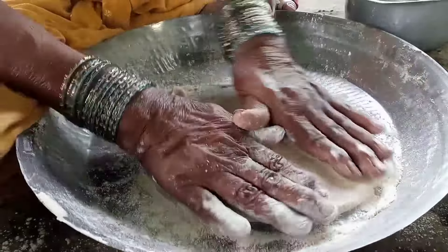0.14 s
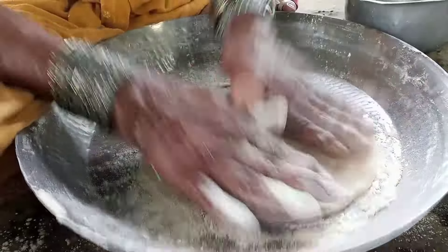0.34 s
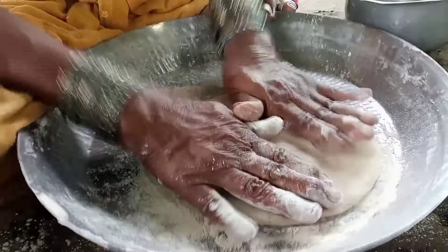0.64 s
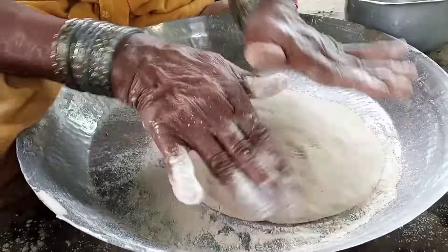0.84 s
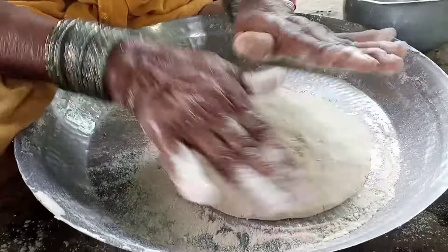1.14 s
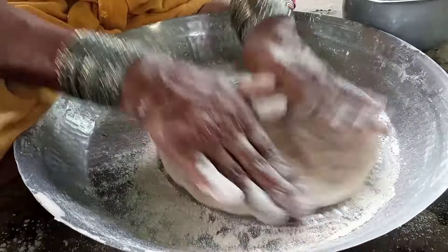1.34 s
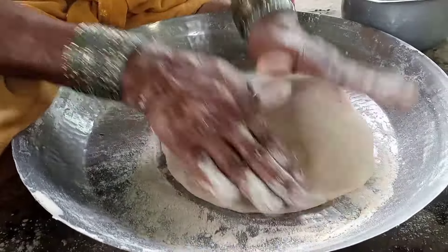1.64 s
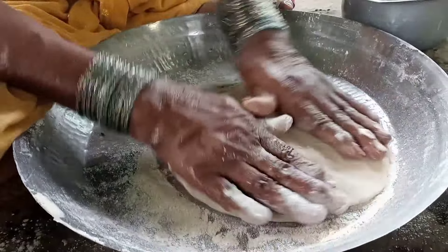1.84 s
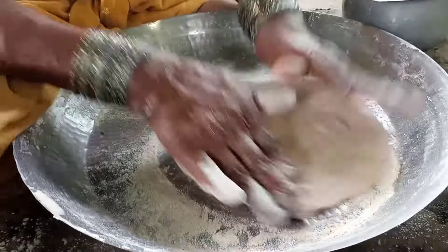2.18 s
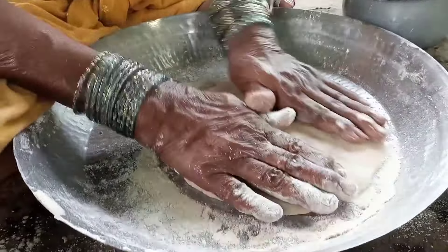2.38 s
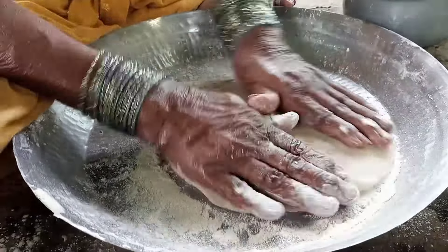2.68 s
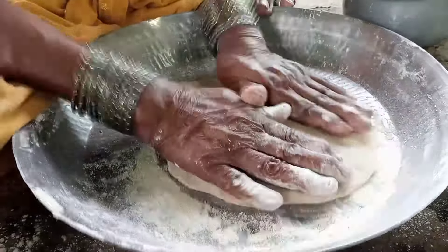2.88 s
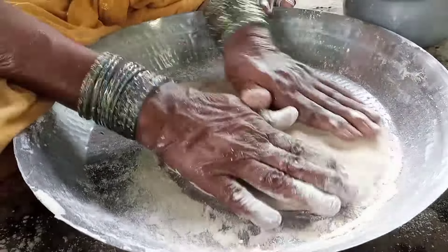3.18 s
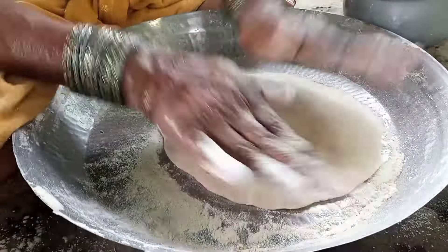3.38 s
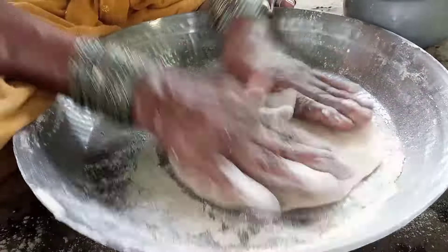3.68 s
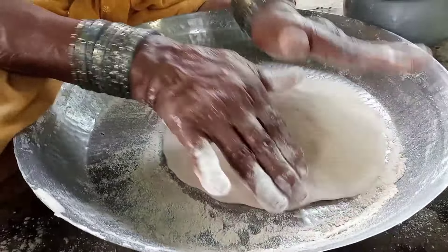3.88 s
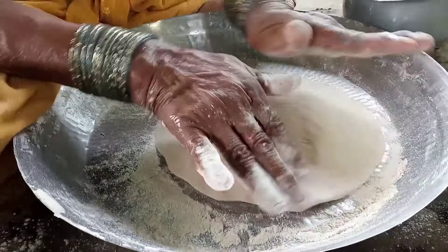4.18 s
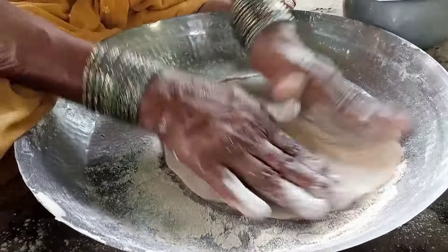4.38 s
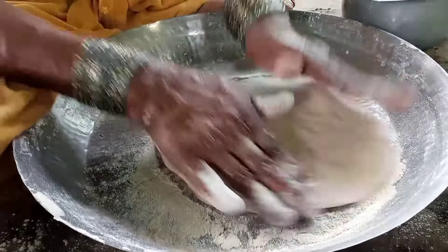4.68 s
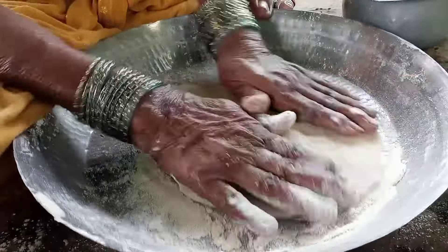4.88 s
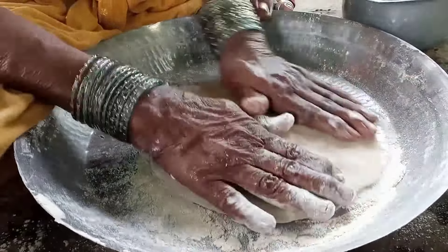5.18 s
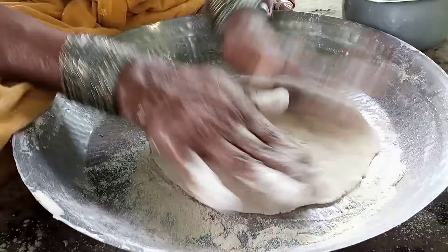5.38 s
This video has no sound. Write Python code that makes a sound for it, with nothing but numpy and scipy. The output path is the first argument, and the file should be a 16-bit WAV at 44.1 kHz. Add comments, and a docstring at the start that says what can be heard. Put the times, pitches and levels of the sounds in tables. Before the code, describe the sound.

Brisk rhythmic dough slaps, about three and a half a second, thud in a pan while stacked bangles clink brightly and faint birds chirp.

```python
"""Patting dough in a floury pan

Two hands pat a disc of dough flat in a metal pan, close to a phone in a small kitchen. Each pat is two quick
contacts, fingers then palm: noise bursts smack, a sagging sine thuds and damped modes ring the pan.
Flurries of glass contacts excite the modes of stacked bangles; grainy noise gives rustling flour and scuffs.
Swept sines whistle like small birds over a faint hum and ambience; a limiter ducks the peaks."""
import sys
import numpy as np
from scipy import signal
from scipy.fft import rfft, irfft, next_fast_len
from scipy.io import wavfile
from scipy.ndimage import uniform_filter1d, minimum_filter1d, map_coordinates

SR = 44100
rng = np.random.default_rng(int(sys.argv[2]) if len(sys.argv) > 2 else 0)


def bounce(signal):
    """Save signal as a 16-bit WAV file at the path given by the first command-line argument."""
    frames = np.transpose(np.atleast_2d(signal))
    limited = np.clip(frames, -1, 1)
    pcm = np.round(limited * 32767).astype(np.int16)
    wavfile.write(sys.argv[1], SR, pcm)


N = 243873

# All level_db columns are relative: each source applies its own gain to them.


def amp(db):
    """Decibel law: the amplitude ratio of a level."""
    return 10 ** (np.asarray(db) / 20)


def unit(x):
    """Normalisation to an rms of 1."""
    return x / np.sqrt(np.mean(x ** 2) + 1e-20)


def along(points, hz):
    """Linear interpolation of (frequency_hz, value) points on a log-frequency axis."""
    f, v = np.transpose(points)
    return np.interp(np.log(hz + 1), np.log(f + 1), v)


def add(track, s, sound):
    """Superposition: mix a sound into the track at time s."""
    start = max(0, round(s * SR))
    part = sound[:max(0, N - start)]
    track[start:start + len(part)] += part


def filtered(x, response):
    """Linear filtering: multiply the spectrum by a response of frequency."""
    m = next_fast_len(N + SR // 2)
    spectrum = rfft(x, m) * response(np.fft.rfftfreq(m, 1 / SR))
    return irfft(spectrum, m)[:N]


def coloured(x, spectrum, size=4096):
    """Minimum-phase filtering: a causal impulse response of energy 1 with this spectral shape."""
    cepstrum = irfft(np.log(amp(along(spectrum, np.fft.rfftfreq(size, 1 / SR)))))
    # folding the cepstrum onto positive times makes the filter causal
    cepstrum[1:size // 2] *= 2
    cepstrum[size // 2 + 1:] = 0
    impulse = irfft(np.exp(rfft(cepstrum)))
    return signal.fftconvolve(x, impulse / np.linalg.norm(impulse))[:N]


def grains(spread_db, size=N):
    """Granular friction: noise of rms 1 made of tiny contacts of unequal strength."""
    strengths = amp(spread_db * rng.standard_normal(size // 16 + 1))
    return unit(rng.standard_normal(size) * np.repeat(strengths, 16)[:size])


def wobble(rate, size):
    """Random modulation: a smooth curve through random knots, rate of them a second."""
    knots = rng.standard_normal(int(size * rate / SR) + 4)
    return map_coordinates(knots, [np.arange(size) * rate / SR])


def fade(t, attack, t60):
    """Damped envelope: a quick rise and an exponential decay."""
    return (1 - np.exp(-t / attack)) * amp(-60 * t / t60)


# Reverberation of the room: frequency_hz, t60_s
KITCHEN_DECAY = [(80, 0.48), (400, 0.2), (2000, 0.43), (7000, 0.073), (15000, 0.13)]


def kitchen(x, count=20):
    """Diffuse reverberation: decaying noise tails, a new one per section because the moving hands alter it."""
    wet = np.zeros(N)
    for part in np.array_split(np.arange(N), count):
        hz, t, z = signal.stft(rng.standard_normal(SR // 2), SR, nperseg=256)
        decay = amp(-60 * t / along(KITCHEN_DECAY, hz)[:, None])
        tail = signal.istft(z * decay, SR, nperseg=256)[1]
        echo = signal.fftconvolve(x[part], tail / np.linalg.norm(tail))
        add(wet, part[0] / SR + .006, echo)
    return wet


# Spectral shape of the quiet house: frequency_hz, level_db
AMBIENCE_SPECTRUM = [(18, -40), (30, -20), (215, 0.5), (374, -13), (449, 5), (666, -11), (913, 1),
                     (1430, -21), (2540, -14), (6380, -16.5), (7270, -29), (8300, -57), (13000, -71),
                     (14800, -38), (16000, -12)]


def ambience():
    """Stationary background noise: white noise shaped by a fixed spectrum."""
    return amp(-36) * coloured(rng.standard_normal(N), AMBIENCE_SPECTRUM)


def hum(hz=445, width_hz=22):
    """Narrow-band noise: a resonant response makes a faint, steady hum in the room."""
    band = filtered(rng.standard_normal(N), lambda f: 1 / (1 + ((f - hz) / width_hz) ** 2))
    return amp(-43.5) * unit(band)


# After each pat the dough slides round on the flour
SLIDE_DELAY_S, SLIDE_RISE_S, SLIDE_HOLD_S, SLIDE_FALL_S = 0.042, 0.019, 0.075, 0.21
REST_DB = -40  # the resting hand still rubs a little
PAT_PERIOD_S = .28
# How hard the dough rubs as it slides: time_s, level_db
SLIDE_LEVEL = [(0, -34), (.5, -37.5), (1.5, -38), (2.6, -36.5), (3.05, -36.5), (4.1, -33.5), (4.7, -37),
               (5.1, -32), (5.5, -36)]


def sliding():
    """Sliding friction: rubbing follows every pat, and one slide is already under way at the start."""
    t = np.arange(N) / SR
    starts = [PATS[0][0] - PAT_PERIOD_S] + [s for s, *_ in PATS]
    corners = np.cumsum([SLIDE_DELAY_S, SLIDE_RISE_S, SLIDE_HOLD_S, SLIDE_FALL_S])
    speed = sum(np.interp(t - s, corners, [0, 1, 1, 0]) for s in starts)
    slide_gain = amp(np.interp(t, *np.transpose(SLIDE_LEVEL)))
    return np.hypot(amp(REST_DB), speed * slide_gain)


# Spectral shape of the rustle: frequency_hz, level_db
FLOUR_SPECTRUM = [(150, -17), (450, 3.5), (700, 1.5), (1050, -0.5), (1600, -6.5), (2400, 3.5), (3400, 5),
                  (5000, 2), (6800, -1.5), (8300, -17), (15000, -51)]


def flour(unevenness_db=1.4):
    """Granular friction: fine grains rub unevenly between dough and metal."""
    uneven_db = unevenness_db * wobble(70, N)
    grit = grains(spread_db=2.5)
    return coloured(sliding() * amp(uneven_db + 4.5) * grit, FLOUR_SPECTRUM)


# Bird whistles, before their waver: start_s, length_s, start_hz, end_hz, level_db
WHISTLES = [(0.018, 0.052, 6240, 4570, -22.5), (0.602, 0.18, 7120, 6370, -19.5),
            (0.875, 0.15, 5560, 5410, -20), (1.755, 0.064, 5500, 5700, -14.5),
            (3.913, 0.073, 5820, 5400, -18.5), (3.972, .07, 4270, 4780, -24),
            (5.088, 0.12, 7300, 6700, -17.5), (5.128, 0.07, 3220, 4100, -21)]


def birds():
    """Frequency modulation: thin, wavering, mostly falling whistles, reverberant as if some way off."""
    out = np.zeros(N)
    for s, length, start_hz, end_hz, db in WHISTLES:
        u = np.linspace(0, 1, round(length * SR))
        glide = start_hz + (end_hz - start_hz) * u ** 1.4
        pitch = glide + 110 * wobble(400, len(u))
        loudness = amp(db - 9.5 + 1.7 * wobble(94, len(u))) * np.sin(np.pi * u)
        add(out, s, loudness * np.sin(2 * np.pi * np.cumsum(pitch) / SR))
    return out + amp(-4) * kitchen(out)


PALM_SMACK_HZ, SMACK_SCATTER = 2643, 0.033  # air escaping under the palm; random share of every smack pitch
FINGER_KNOCK_DB = -13.5  # the shallow hollow under the fingers, relative to their smack
# Pats, fingers first and then the palm; thud pitches are nominal, the knock is the hollow under the palm:
# start_s, finger_smack_db, finger_thud_db, finger_thud_hz,
# palm_lag_s, palm_smack_db, palm_thud_db, palm_thud_hz, palm_knock_db
PATS = [(.1408, -10, -13, 192, 0.019, -9, -28, 198, -22),
        (0.4387, -2.5, -15.5, 184, 0.011, -12, -15, 174, -8),
        (.7219, -4.5, -12.5, 218, 0.014, -22, -11.5, 175, -29),
        (1.0053, -7, -7.5, 243, 0.031, -12, -19.5, 210, -19),
        (1.296, -4, -9, 161, 0.022, -13.5, -21, 210, -15.5),
        (1.5618, -3.5, -18.5, 225, 0.014, -5, -10.5, 159, -15.5),
        (1.84, -4.5, -8.5, 205, 0.011, -21, -10, 145, -20),
        (2.1244, -1, -12.5, 183, 0.012, -8.5, -12.5, 153, -11),
        (2.4006, -3, -26, 187, 0.013, -8, -7.5, 281, -6),
        (2.6679, 0, -12, 276, 0.017, -1.5, -10.5, 212, -6.5),
        (2.9422, -3, -21, 165, 0.015, -8, -10.5, 297, -13),
        (3.2141, 3.5, -10.5, 175, 0.012, -18, -13, 300, -9.5),
        (3.4951, 0, -11.5, 175, 0.018, -7.5, -14.5, 245, -5.5),
        (3.7681, -4, -17, 300, .018, -4.5, -10.5, 257, -5),
        (4.0427, 5, -16.5, 208, 0.02, -4.5, -10, 248, -3.5),
        (4.3292, -2.5, -11, 214, .023, -6, -13.5, 250, -12.5),
        (4.6179, -2, -15, 276, 0.02, -2, -12, 281, -12.5),
        (4.902, -2.5, -11.5, 239, 0.03, 0.5, -12.5, 306, -8.5),
        (5.1893, -2, -13, 347, 0.027, -4.5, -13.5, 212, -14.5),
        (5.474, 0, -13.5, 240, .0244, -4, -12, 286, -6)]
# Pitch of the air escaping under the fingers as the hand changes shape, before scatter: time_s, pitch_hz
FINGER_SMACK = [(.14, 3400), (.44, 2450), (1.3, 2700), (1.84, 3770), (2.4, 3010), (2.9, 3254), (5.5, 3360)]


def contacts():
    """Successive impacts, fingers then palm: start_s, smack_db, thud_db, thud_hz, knock_db, smack_hz."""
    rows = []
    for s, smack_db, thud_db, hz, lag, palm_smack_db, palm_thud_db, palm_hz, knock_db in PATS:
        finger, palm = 1 + SMACK_SCATTER * rng.standard_normal(2)
        finger_hz = np.interp(s, *np.transpose(FINGER_SMACK))
        rows.append((s, smack_db, thud_db, hz, smack_db + FINGER_KNOCK_DB, finger_hz * finger))
        rows.append((s + lag, palm_smack_db, palm_thud_db, palm_hz, knock_db, PALM_SMACK_HZ * palm))
    return rows


# Modes of the pan, damped by the dough, before scatter: frequency_hz, level_db, t60_s
PAN_MODES = [(58.8, -18, 0.31), (103.3, -10, 0.12), (133, -9.5, 0.14), (182.7, -11, 0.21),
             (219.2, -6.5, 0.21), (272.6, -6, 0.13), (350, -20, 0.23), (428.7, -17.5, 0.13),
             (509, -14.5, 0.087), (579, -19.5, 0.28), (729, -24.5, 0.16), (950, -26, 0.043),
             (1078, -18.5, 0.081)]


def thuds(touches, knock_hz=450, bass_growth_db_per_s=0.1):
    """Modal excitation: each contact pushes the dough, whose note sags, and rings the pan beneath."""
    out, t = np.zeros(N), np.arange(SR // 2) / SR
    for s, _, db, hz, knock_db, _ in touches:
        # the note falls as the hand sinks in, from 1.155 to 0.845 of its nominal pitch
        pitch = hz * (1 + 0.31 * (np.exp(-t / 0.0089) - .5))
        dough = np.sin(2 * np.pi * np.cumsum(pitch) / SR) * fade(t, 0.0013, 0.055)
        pan = np.zeros(len(t))
        for mode_hz, mode_db, t60 in PAN_MODES:
            # the pan modes below 200 Hz grow slightly stronger with time
            weight_db = bass_growth_db_per_s * (s - 2.5) * (mode_hz < 200)
            cycles = mode_hz * (1 + rng.normal(0, .012)) * t + rng.random()
            strength = amp(mode_db + weight_db + rng.normal(0, 0.94))
            pan += strength * fade(t, 0.00092, t60) * np.sin(2 * np.pi * cycles)
        add(out, s, amp(db + 8.5) * dough + amp(db + 5) * pan)
        # the hollow under the hand knocks as it closes
        hollow_hz = knock_hz * (1 + rng.normal(0, 0.067))
        hollow = np.sin(2 * np.pi * hollow_hz * t) * fade(t, 0.0012, 0.029)
        add(out, s + 0.002053, amp(knock_db + 12.0) * hollow)
    return out + amp(-16.5) * kitchen(out)


# Spectral shape of the air burst: frequency_hz, level_db
SMACK_SPECTRUM = [(150, -18), (500, -4.5), (1050, 4), (1800, -8), (2400, 0.5), (3200, 2.5), (4200, -3),
                  (5400, -2), (7000, -12), (8500, -27.5), (15000, -37)]


def smacks(touches):
    """Air-jet noise: air bursts out between skin and dough; gaps between the fingers give a brief pitch."""
    force, pops, t = np.zeros(N), np.zeros(N), np.arange(SR // 10) / SR
    for s, db, _, _, _, hz in touches:
        add(force, s, amp(db - 4.5) * fade(t, 0.0015, 0.038))
        phase = 2 * np.pi * hz * t + 1.24 * wobble(1125, len(t))
        add(pops, s, amp(db + 6.5) * fade(t, 0.0013, 0.011) * np.sin(phase))
    out = coloured(force * grains(spread_db=2), SMACK_SPECTRUM) + pops
    return out + amp(-18) * kitchen(out)


# The pan rocks back after each pat: delay at the start, its growth, mean level
ROCK_DELAY_S, ROCK_LATER_S_PER_S, ROCK_DB = .046, 0.00303, -18
# The loudest stray taps of the fingers and the pan: start_s, level_db
STRAY_TAPS = [(.798, -19), (1.088, -22), (1.611, -10.5), (1.802, -17.5), (1.878, -9.5), (2.204, -14.5),
              (2.629, -21), (3.03, -16), (3.728, -20), (3.864, -15), (4.393, -15.5), (5.236, -9)]


def taps():
    """Rocking impact: the pan rocks back once a pat, later as the disc widens, never alike: start_s, level_db."""
    rocks = []
    for s, *_ in PATS:
        delay = ROCK_DELAY_S + ROCK_LATER_S_PER_S * s + rng.normal(0, 0.0021)
        rocks.append((s + delay, ROCK_DB + rng.normal(0, 1)))
    return STRAY_TAPS + rocks


# Spectral shape of scuffs and taps: frequency_hz, level_db
SCUFF_SPECTRUM = [(150, -24), (400, -1.5), (600, 3), (780, 5.5), (1050, -1), (1300, -18), (1550, -2),
                  (1800, -14), (2400, -1), (3500, -10), (6000, -9), (9000, -21.5), (15000, -41)]


def scuffs(touches, life=0.13):
    """Sliding friction and impact: the hand shoves the dough on and scuffs; the pan rocks and taps."""
    force, t = np.zeros(N), np.arange(SR // 4) / SR
    for s, _, db, _, _, _ in touches:
        add(force, s, amp(db - 12) * fade(t, 0.0099, life))
    for s, db in taps():
        add(force, s, amp(db - 1.0) * fade(t, 0.00051, 0.025))
    out = coloured(force * grains(spread_db=4.0), SCUFF_SPECTRUM)
    return out + amp(-11.5) * kitchen(out)


CLASH_JITTER_S, CLASH_SCATTER_DB = .002, 1.5
SETTLE_FROM_S, SETTLE_TO_S, SETTLE_DB = .015, .07, -16.5  # delays and relative level of the settling clinks


def jingle(s, length, db, upper_db, run, count=2):
    """Successive collisions: clashes run down the stack, which then settles: start_s, level_db, upper_db."""
    rows = []
    for place, step_db, upper_step_db in run:
        late, strong, bright = rng.standard_normal(3)
        rows.append((s + place * length + CLASH_JITTER_S * late,
                     db + step_db + CLASH_SCATTER_DB * strong,
                     upper_db + upper_step_db + CLASH_SCATTER_DB * bright))
    delays = SETTLE_FROM_S + (SETTLE_TO_S - SETTLE_FROM_S) * rng.random(count)
    return rows + [(s + delay, db + SETTLE_DB, upper_db + SETTLE_DB) for delay in delays]


# The bangles run together as the arm stops; upper is the overtones: middle_s, length_s, level_db, upper_db
STOPS = [(0.202, 0.011, -11, -20), (0.492, 0.015, -4, -13.5), (0.773, 0.017, -4.5, -9.5),
         (1.063, 0.023, -4, -10.5), (1.346, 0.022, -7, -9.5), (1.618, 0.012, -7, -13),
         (1.889, 0.022, -11.5, -16), (2.166, 0.0092, -10, -12.5), (2.461, 0.013, -9, -10),
         (2.726, 0.023, -5, -18), (3.007, 0.026, -5, -15), (3.278, 0.019, -8.5, -13),
         (3.548, 0.02, -9, -17.5), (3.83, 0.016, -8.5, -20.5), (4.103, 0.011, -6, -17),
         (4.389, 0.01, -11, -24), (4.686, 0.013, -10.5, -16.5), (4.967, 0.026, -12.5, -17),
         (5.257, 0.017, -12, -19), (5.51, 0.024, -18, -24)]
# And again as the arm shoves the dough on: middle_s, length_s, level_db, upper_db
SHOVES = [(0.253, 0.033, -19, -22), (0.563, 0.037, -3, -17.5), (0.84, 0.031, -4, -11),
          (1.126, 0.013, -4.5, -15.5), (1.405, 0.013, -6, -18), (1.674, 0.012, -9.5, -19.5),
          (1.985, 0.024, -4, -13.5), (2.261, 0.021, -5.5, -16.5), (2.522, 0.033, -8.5, -16.5),
          (2.79, 0.026, -6.5, -20.5), (3.076, 0.019, -4.5, -16), (3.339, 0.022, -6.5, -20.5),
          (3.633, 0.024, -7, -20), (3.905, 0.026, -7, -13.5), (4.164, 0.015, -8, -16),
          (4.46, 0.022, -7.5, -18), (4.746, 0.02, -5, -15.5), (5.017, 0.027, -10, -20.5),
          (5.311, 0.021, -14, -18.5)]
# Single loose bangles: start_s, level_db, upper_db
CLINKS = [(.53, -11, -16), (0.977, -16, -30), (1.107, -13, -32), (1.545, -34, -23.5), (2.1133, -22, -22),
          (2.166, -12, -7), (2.2256, -9.5, -26), (3.475, -18.5, -51), (3.6044, -12, -35)]
# Clashes within a stopping jingle: place (in jingle lengths from its middle), level_db, upper_db
STOP_RUN = [(-1.3, -11, -12.5), (-.4, -4, -5), (0.57, -5, -6.5)]
# Clashes within a shoving jingle: place (in jingle lengths from its middle), level_db, upper_db
SHOVE_RUN = [(-.4, -2, -3), (.35, -3, -7)]


def clashes():
    """Inertial collision: bangles clash as the arm stops and shoves, and a few clink singly."""
    stops = [clash for row in STOPS for clash in jingle(*row, STOP_RUN)]
    shoves = [clash for row in SHOVES for clash in jingle(*row, SHOVE_RUN)]
    return stops + shoves + CLINKS


# Modes of the glass bangles, before scatter and the choking by the stack: frequency_hz, level_db, t60_s
GLASS_MODES = [(2424, -13, 0.044), (5424, -2, 0.024), (6100, -29, .05), (6210, -6, 0.044),
               (6378, -1, 0.035), (6490, 0, 0.047), (7130, -7, 0.06), (7210, 0.5, 0.07), (7260, -16, 0.068),
               (10540, -11, 0.054), (11910, -14, 0.11), (11960, -14, 0.15), (12900, -22, .06),
               (14500, -23, .1), (14600, 0, 0.027), (14960, -0.5, 0.017)]
# Spectral shape of the unpitched glass ticks: frequency_hz, level_db
TICK_SPECTRUM = [(1000, -63.5), (1900, -7.5), (2500, 3), (4600, -18), (5600, 7.5), (6500, 8.5), (7300, 7),
                 (8200, -22.5), (9800, -15), (12000, -7), (13200, 0), (14500, -1), (15500, -30),
                 (16200, -36)]


def bangles():
    """Modal synthesis: a swelling, fading flurry of contacts excites glass modes that vary with each clash."""
    out, t = np.zeros(N), np.arange(SR // 6) / SR
    lead = .03  # seconds of swell before the clash time
    after = t - lead - .003
    core = np.exp(np.minimum(after / 0.0038, -after / 0.005))
    flurry = core + amp(-17) * np.exp(-np.abs(after) / 0.016)
    for s, db, upper_db in clashes():
        ring = np.zeros(len(t))
        # other bangles take part each time, so strengths and pitches scatter
        for hz, mode_db, t60 in GLASS_MODES:
            strength_db, detune, phase = rng.normal(0, [4.5, .008, 3])
            level_db = (db if hz < 9000 else upper_db + 8.0) + mode_db + strength_db - 0.5
            tone = np.sin(2 * np.pi * hz * (1 + detune) * t + phase)
            ring += amp(level_db - 60 * t / t60) * tone / np.sqrt(t60 * SR)
        # the neighbours in the stack choke every long ring
        ring *= amp(-60 * t / .2)
        strikes = flurry * grains(spread_db=5, size=len(t))
        strikes *= np.linalg.norm(flurry) / np.linalg.norm(strikes)
        add(out, s - lead, signal.fftconvolve(strikes, ring))
        # the contacts also tick, without a pitch
        ticks = flurry * grains(spread_db=2.5, size=len(t))
        add(out, s - lead, amp((db + upper_db) / 2 - 2.5) * coloured(ticks, TICK_SPECTRUM))
    return out + amp(-12) * kitchen(out)


TINK_DB, TINK_T60_S, TINK_SPREAD_S = -17, .05, .025  # mean level under the jingle, decay, scatter in time


def tinks(count=5):
    """Free vibration: around each jingle a few bangles come free of the stack and ring one clear note each."""
    out, t = np.zeros(N), np.arange(SR // 8) / SR
    for s, _, db, upper_db in list(STOPS) + list(SHOVES):
        for _ in range(count):
            hz = GLASS_MODES[rng.integers(len(GLASS_MODES))][0] * (1 + rng.normal(0, .025))
            level_db = (db if hz < 9000 else upper_db) + TINK_DB + rng.normal(0, 3)
            note = fade(t, .0005, TINK_T60_S) * np.sin(2 * np.pi * hz * t)
            add(out, s + TINK_SPREAD_S * rng.standard_normal(), amp(level_db) * note)
    return out + amp(-12) * kitchen(out)


def scene():
    """Superposition: the hands at work over birds, hum and the quiet sounds of the house."""
    background = ambience() + hum() + birds()
    touches = contacts()
    hands = flour() + thuds(touches) + smacks(touches) + scuffs(touches) + bangles() + tinks()
    return (background + hands)[None]


def limited(x, ceiling_db, size=300):
    """Peak limiting: the gain ducks for a few milliseconds around peaks that pass the ceiling."""
    needed = np.minimum(1, amp(ceiling_db) / (np.abs(x) + 1e-9))
    held = minimum_filter1d(needed, size, origin=size // 3)
    return x * uniform_filter1d(held, size // 4)


TOP_HZ = 15700


def record(dry):
    """Band limiting: the deepest bass is shed, the phone limits the peaks and cuts all above its top."""
    high_pass = signal.butter(2, 40, "high", fs=SR, output="sos")
    sound = signal.sosfilt(high_pass, dry[0])
    sound = limited(sound, ceiling_db=-1)
    return filtered(sound, lambda hz: hz < TOP_HZ)[None]


dry = scene()
out = record(dry)
bounce(out)
```